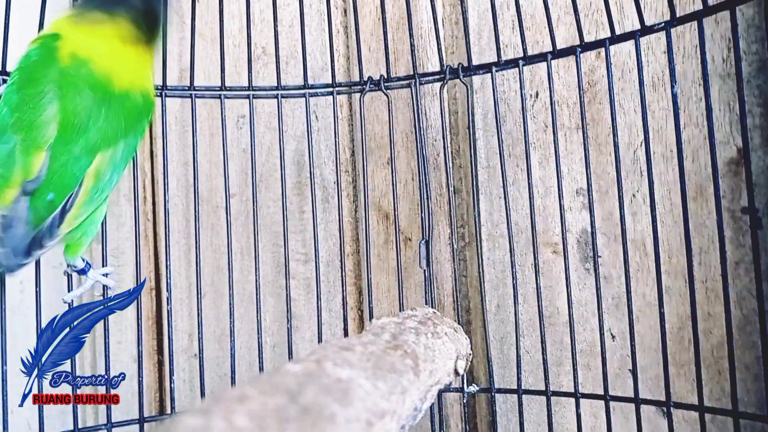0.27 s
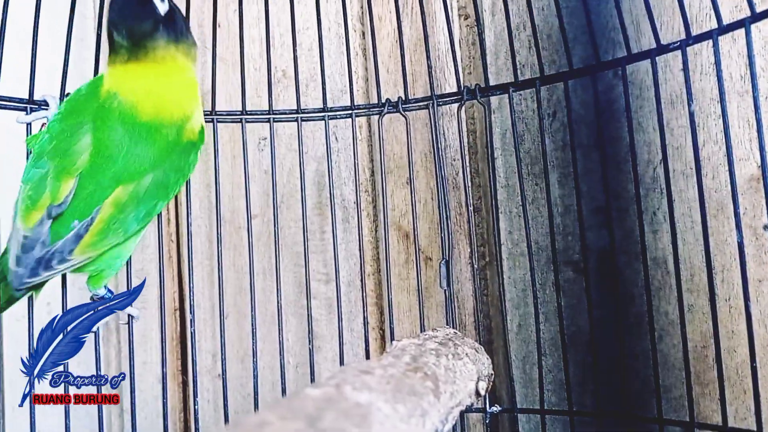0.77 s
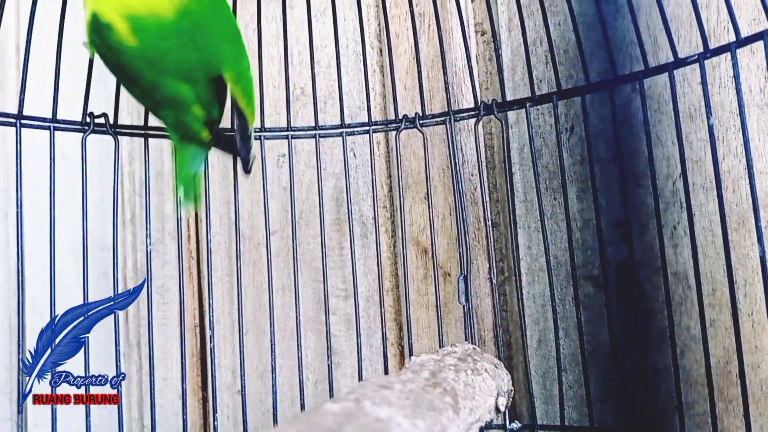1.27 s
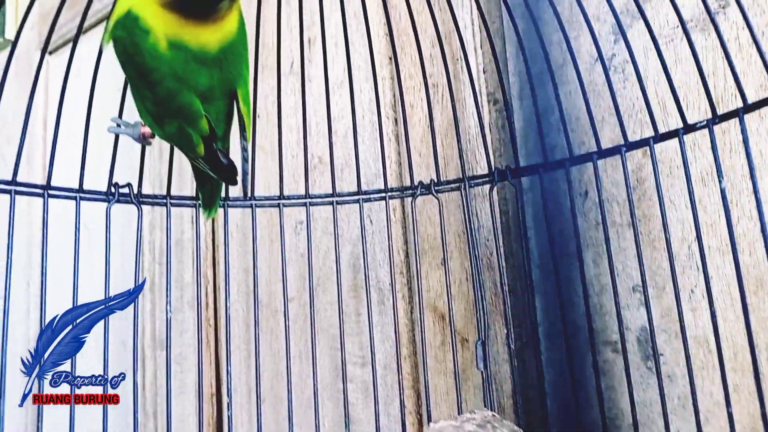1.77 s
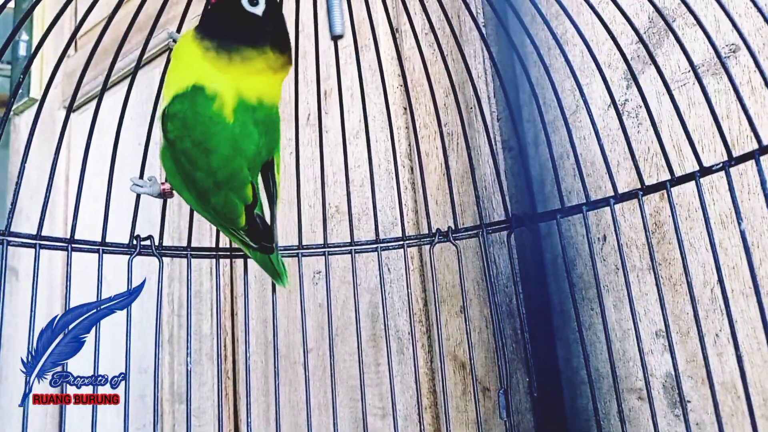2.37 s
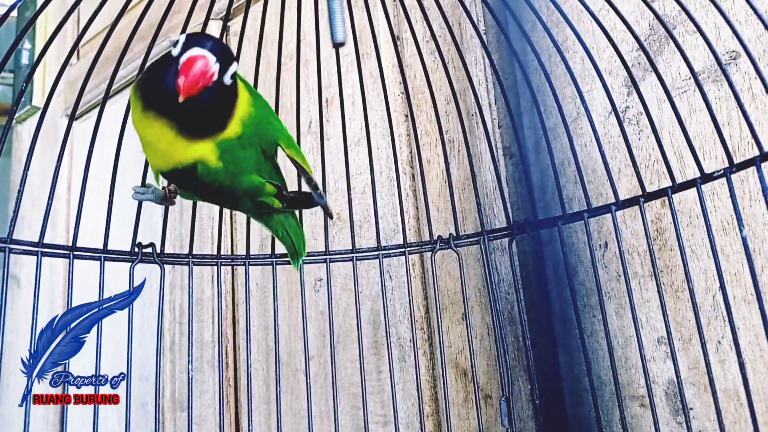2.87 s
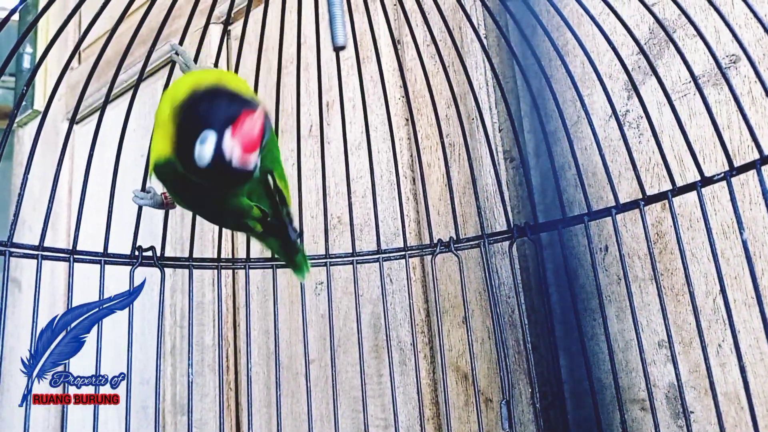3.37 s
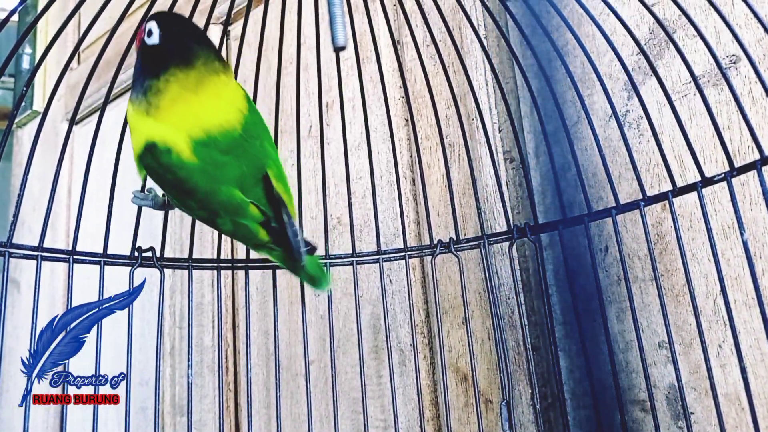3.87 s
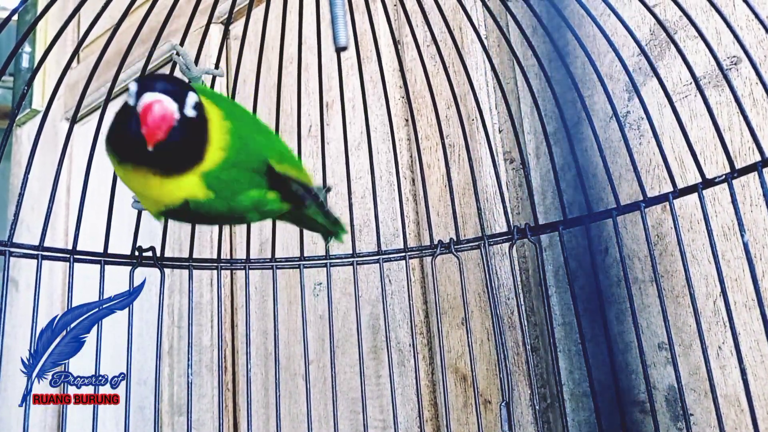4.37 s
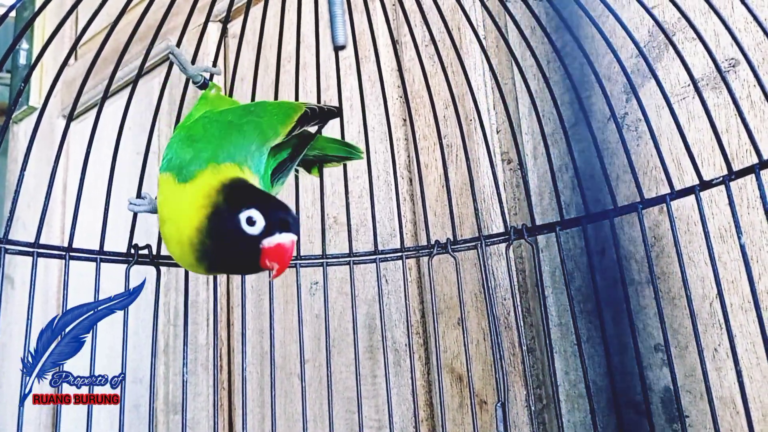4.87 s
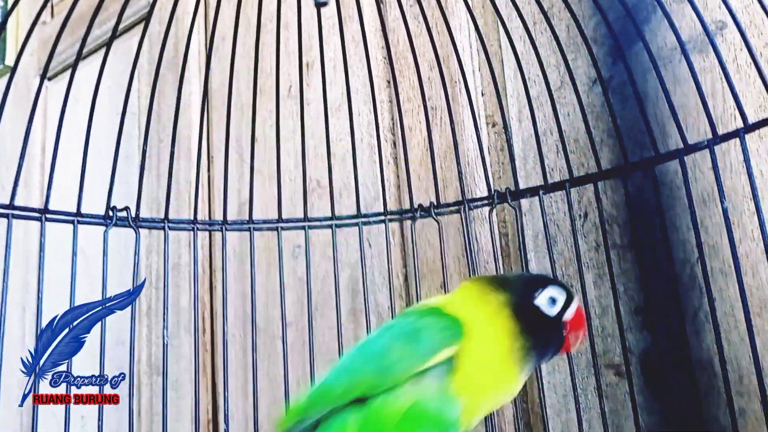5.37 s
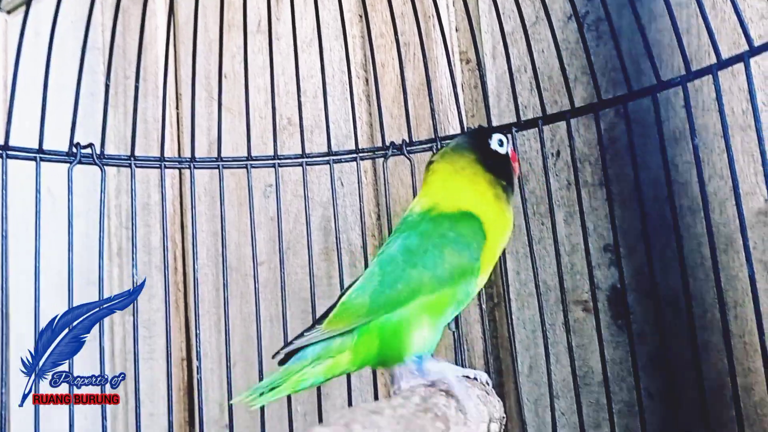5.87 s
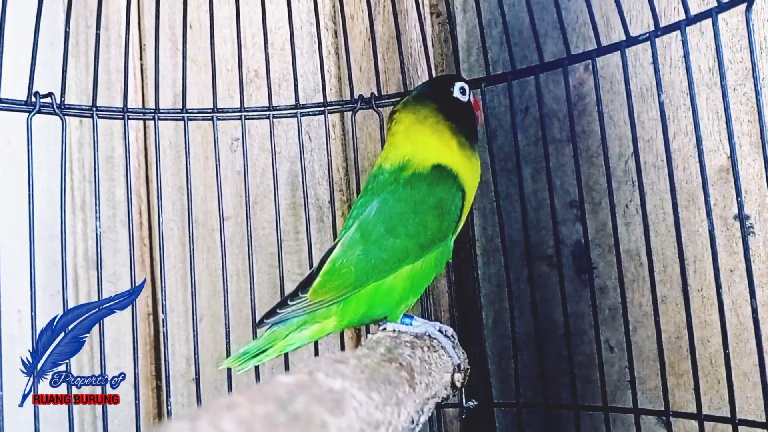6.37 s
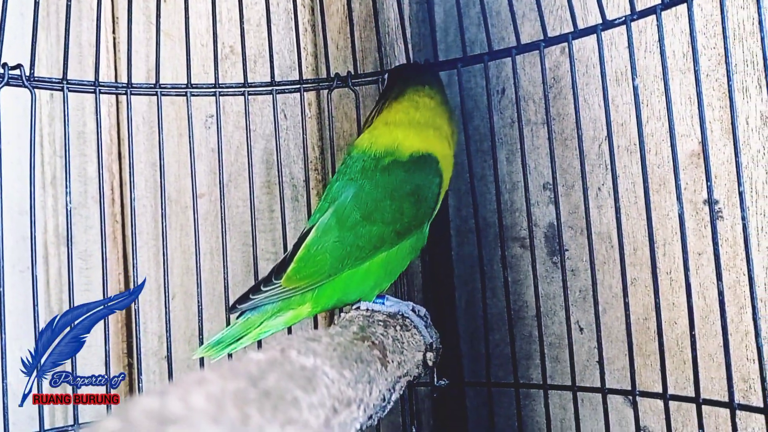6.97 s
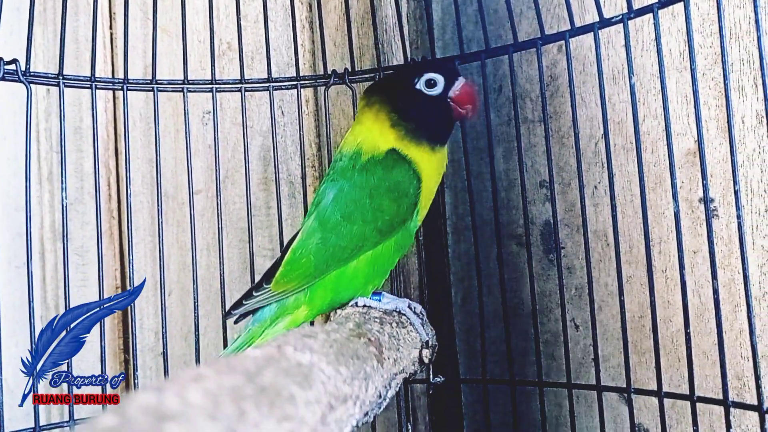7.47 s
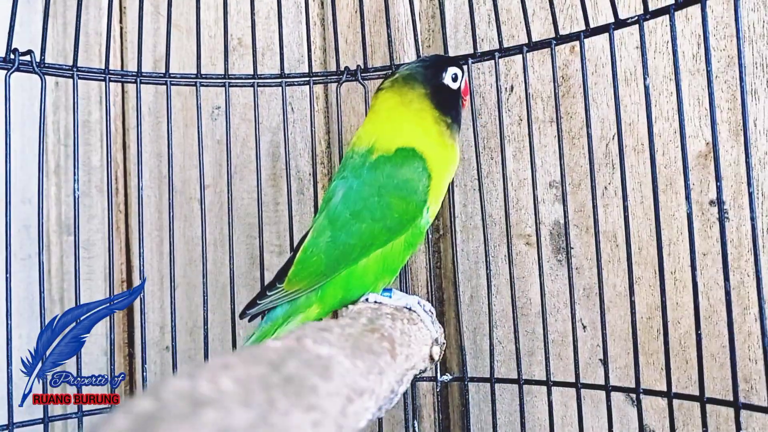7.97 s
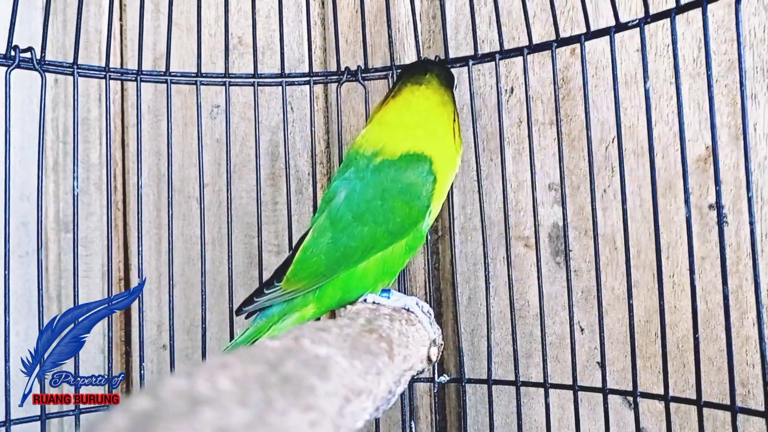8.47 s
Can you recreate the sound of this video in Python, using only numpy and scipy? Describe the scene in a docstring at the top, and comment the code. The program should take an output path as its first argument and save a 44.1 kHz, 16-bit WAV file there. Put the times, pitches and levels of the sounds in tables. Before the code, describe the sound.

Outdoors by a wooden wall, one small parrot calls at machine-like speed near the microphone, bright and piercing with slight cage and yard echo. Its repeated notes begin as sliding whistles, roughen into buzzes and noisy rasps, break into a yelp, whine and rising squeals, then settle into crisp, high ticks. A second bird peeps farther off early and late; quiet rumble, hum, blurred hoots and dull knocks sit underneath.

```python
"""A lovebird chatters in a wire cage close to the microphone, eight to ten syllables a second, over a low
outdoor rumble and a faint hum. Whistled chips give way to buzzes, rasps and stutters, then a yelp, a whine,
rising squeals and short clicking ticks: harmonics of one gliding, fluttering pitch, coloured by throat and beak.
A second bird peeps farther off early and late; narrow noise bands make distant hoots from 1.7 s on, and
decaying modes of the cage stand make three soft knocks, one early and two late."""
import sys
import numpy as np
from scipy import signal
from scipy.fft import rfft, irfft, next_fast_len
from scipy.io import wavfile
from scipy.ndimage import uniform_filter1d, minimum_filter1d, map_coordinates

SR = 44100
rng = np.random.default_rng(int(sys.argv[2]) if len(sys.argv) > 2 else 0)


def dump(signal):
    """Clip the signal to [-1, 1] and save it as 16-bit WAV at the path in sys.argv[1]."""
    limited = np.clip(np.atleast_2d(signal).T, -1, 1)
    pcm = np.round(limited * 32767).astype(np.int16)
    wavfile.write(sys.argv[1], SR, pcm)


N = 384552
TOP_HZ = 15900  # band limit of the voice and of the microphone

# closing ticks of the chatter: t/s, level/dB before the run's gain, top pitch f/Hz
TICKS = [(6.8236, -13, 4250), (6.9258, -15, 4150), (7.0297, -14.5, 4350), (7.1299, -15, 4480),
         (7.2285, -13.5, 4430), (7.3302, -14.5, 4440), (7.431, -14.5, 4380), (7.533, -14.5, 4365),
         (7.6342, -15.0, 4290), (7.7355, -14.0, 4290), (7.8315, -14.5, 4370), (7.9314, -14, 4420),
         (8.0299, -13, 4500), (8.1292, -14, 4440), (8.2298, -14, 4430), (8.3266, -13.5, 4415),
         (8.4268, -14, 4530), (8.529, -13.5, 4460), (8.632, -13, 4355)]


def amp(db):
    """Level to amplitude: 20 dB is a factor of ten."""
    return 10 ** (np.asarray(db) / 20)


def unit(x):
    """Normalization to an rms value of 1."""
    return x / np.sqrt(np.mean(x ** 2) + 1e-20)


def along(points, hz):
    """Interpolation of (f/Hz, value) points on a logarithmic frequency axis."""
    f, v = np.transpose(points)
    return np.interp(np.log(hz + 1), np.log(f), v)


def curve(rows):
    """Linear interpolation of (t/s, value) points to one value per sample."""
    return np.interp(np.arange(N) / SR, *np.transpose(rows))


def wobble(rate, size):
    """Band-limited random fluctuation: a smooth curve through random knots, rate knots a second."""
    knots = rng.standard_normal(1024)
    return map_coordinates(knots, [np.arange(size) * rate / SR], mode="wrap")


def filtered(x, response):
    """Linear filtering: the spectrum of x times a real response of frequency."""
    m = next_fast_len(N + SR // 2)
    hz = np.fft.rfftfreq(m, 1 / SR)
    return irfft(rfft(x, m) * response(hz), m)[..., :N]


def noise(spectrum):
    """Coloured noise: white noise shaped by a spectrum, rms 1."""
    return unit(filtered(rng.standard_normal(N), lambda hz: amp(along(spectrum, hz))))


def envelope(x):
    """Short-term rms strength over a window of 2 ms."""
    return np.sqrt(np.abs(uniform_filter1d(x ** 2, size=90)))


def add(track, s, sound):
    """Superposition: mix a sound into the track at time s."""
    part = track[max(round(s * SR), 0):][:len(sound)]
    part += sound[:len(part)]


def background():
    """Broadband ambience as coloured noise with changing levels, plus three frequency-wandering hum lines."""
    # noise spectra: f/Hz, relative level/dB
    deep_spectrum = [(15, -22), (30, -1), (45, 27), (60, 12), (90, -48)]
    low_spectrum = [(47, -19), (80, -1.5), (92, -3.5), (189, 5), (222, -1), (263, -3), (382, -10.5),
                    (500, -23), (650, -38), (1100, -120)]
    wash_spectrum = [(250, -15), (450, 0.5), (750, -6), (1100, -6.5), (1500, -10), (4000, -9),
                     (11000, -17.5), (13000, -26)]
    # slow swells of rumble and wash: t/s, level/dB before gain
    rumble_level = [(0.1, -48.5), (1.92, -45.5), (2.54, -47.5), (5.29, -46.5), (6.73, -43.5), (7.56, -49),
                    (8.6, -50.5)]
    wash_level = [(0.1, -54), (0.72, -57.5), (1.09, -51.5), (2.4, -55), (5.35, -48.5), (5.66, -46),
                  (6.52, -47.5), (6.96, -55.5), (8.6, -59)]
    # hum lines: f/Hz, waver/share of pitch, gain/dB, flicker/dB
    hum_lines = [(73.5, 0.0253, -1.5, 1.5), (118.4, 0.0344, 0.5, 2.5), (266.2, 0.085, -4.5, 5.5)]
    # strength of each hum line: t/s, level/dB before gain
    hum_low = [(0.1, -60.5), (1.73, -47), (1.78, -44), (3.03, -50), (3.39, -43), (3.58, -53), (4.67, -41),
               (5.38, -49), (6.49, -48), (7.65, -61), (8.41, -43), (8.6, -51)]
    hum_middle = [(0.1, -55), (3.58, -52), (4.55, -58), (6.28, -45), (8.01, -54), (8.6, -53)]
    hum_high = [(0.1, -52), (0.26, -52), (3.37, -52), (4.15, -38), (6.99, -63.5), (7.48, -69), (8.6, -57)]
    rumble_gain_db, wash_gain_db = 3.5, 5
    waver_cycles = 4.5  # cycles of a line per random knot

    deep_db = -51 - 1.7 * np.arange(N) / SR  # the deepest rumble slowly dies away
    deep = amp(deep_db + 1.5 * wobble(8.3, N)) * noise(deep_spectrum)
    rumble_db = curve(rumble_level) + rumble_gain_db + 1.16 * wobble(7.7, N)
    rumble = amp(rumble_db) * noise(low_spectrum)
    wash = amp(curve(wash_level) + wash_gain_db) * noise(wash_spectrum)

    hum = np.zeros(N)
    for (hz, waver, gain_db, flicker_db), level in zip(hum_lines, (hum_low, hum_middle, hum_high)):
        line_db = curve(level) + gain_db + flicker_db * wobble(hz / waver_cycles, N)
        pitch = hz * (1 + waver * wobble(hz / waver_cycles, N))
        hum += amp(line_db) * unit(np.sin(2 * np.pi * np.cumsum(pitch) / SR))
    return deep + rumble + wash + hum


def leap(at_s, lead_db, overshoot, settle_s, release_s, flutter, flutter_from_s, calm_s,
         arch=(0, 0, 1, 0), leap_db=0, sag_per_s=0):
    """Tension control of the syrinx: a lead-in, a leap in pitch with relaxing overshoot, a sag and a release."""
    # arch of the lead-in: height in tension, crest/s, half width/s, swell/dB
    height, crest_s, width_s, swell_db = arch

    def gesture(t, length, leap_s=0.00064, release_db=13):
        """Tension (0 rest, 1 top pitch), effort in dB and flutter depth as share of pitch."""
        bow = np.maximum(1 - ((t - crest_s) / width_s) ** 2, 0)
        up = .5 + .5 * np.tanh((t - at_s) / leap_s)
        strain = np.exp(-np.maximum(t - at_s, 0) / settle_s)
        whistle = 1 + overshoot * strain - sag_per_s * (t - length + release_s)
        tension = (1 - up) * height * bow + up * whistle
        effort_db = (1 - up) * (lead_db + swell_db * bow) + up * leap_db * strain
        effort_db -= release_db * np.maximum(1 - (length - t) / release_s, 0) ** 2
        calming = (t > flutter_from_s) * np.exp(-np.abs(t - flutter_from_s) / calm_s)
        return tension, effort_db, .004 + flutter * calming  # a held whistle keeps a slight tremble
    return gesture


def near_echoes(x, echo_db, reach=0.0037, count=6):
    """Early reflection: wall and cage floor return weak copies, redrawn for each note as the bird moves."""
    out = np.pad(x, (0, SR // 50))
    for when, size in zip(rng.uniform(.05, 1, count), rng.standard_normal(count)):
        add(out, when * reach, amp(echo_db) * size * x)
    return out


def syllable(gesture, length, top_hz, rest_hz, flutter_hz, beak_hz, tilt_db, overtone_db, rough):
    """Source and filter: frequency-modulated harmonics slide through throat and beak resonances; rms about 1."""
    # throat response: f/Hz, level/dB
    throat = [(1600, 10), (2100, 0.5), (2500, -5), (3000, 1), (3700, -5), (4400, -1.5), (5100, -5),
              (6100, 7.5), (7300, -3), (8500, -2.5), (9600, -11.5), (11200, -7.5), (12000, -12.5),
              (12800, -65), (15000, -14.5)]
    shimmer_db = 1.2  # fast unevenness of the voice's strength
    size = int(length * SR)
    haste, pace = np.exp(.05 * rng.standard_normal(2))
    progress = length * np.linspace(0, 1, size) ** haste  # no two notes are timed quite alike
    tension, effort_db, flutter = gesture(progress, length)

    flutter_rate = pace * flutter_hz * (1 + 0.1333 * wobble(151.0, size))
    swing = np.sin(2 * np.pi * np.cumsum(flutter_rate) / SR) * flutter
    low_hz = rest_hz * (1 + .02 * rng.standard_normal())  # each note has a slightly different resting pitch
    pitch = (low_hz + (top_hz - low_hz) * tension) * (1 + swing)
    roughness = rough * np.sqrt(np.abs(flutter)) * wobble(2493, size)
    pitch = np.maximum(pitch * (1 + roughness), 500)

    k = np.arange(1, 8)[:, None]  # harmonic numbers
    harmonic_hz = k * pitch
    beak_db = 6 / (1 + ((harmonic_hz - beak_hz) / 900) ** 2)  # beak resonance, placed for each kind of note
    beak_db -= 6 / (1 + ((harmonic_hz - 1.78 * beak_hz) / 600) ** 2)  # and a notch above it
    source_db = tilt_db * np.log2(k) + overtone_db * (k > 1)
    strength = amp(along(throat, harmonic_hz) + beak_db + source_db) * (harmonic_hz < TOP_HZ)
    strength = strength / np.linalg.norm(strength, axis=0)
    tone = (strength * np.sin(2 * np.pi * k * np.cumsum(pitch) / SR)).sum(0)

    to_end = np.minimum(np.arange(size), np.arange(size)[::-1])
    edge = np.clip(to_end / (0.00098 * SR), 0, 1)
    throb_db = 20 * swing  # the voice weakens at the bottom of each deep swing
    loudness = amp(effort_db + throb_db + shimmer_db * wobble(293, size))
    note = near_echoes(tone * edge * loudness, echo_db=-14)
    return note / np.sqrt(np.sum(note ** 2) / size)


def phrase(rows, gesture, rest_hz, flutter_hz, beak_hz, tilt_db, rough, hiss_db, overtone_db=0, gain_db=0):
    """Superposed like syllables, with turbulent air hiss modulated by their envelope."""
    # air hiss in the voice: f/Hz, relative level/dB
    hiss_spectrum = [(300, -53), (1500, -78), (2400, 24), (6000, 26.5), (11500, -15), (12800, -30),
                     (16000, -34)]
    out = np.zeros(N)
    for s, length, top_hz, db in rows:
        note = syllable(gesture, length, top_hz, rest_hz, flutter_hz, beak_hz, tilt_db, overtone_db, rough)
        add(out, s, amp(db + gain_db) * note)
    return out + amp(hiss_db) * envelope(out) * noise(hiss_spectrum)


def series(rows, length_s, growth_per_s, top_hz, drift_hz_per_s=0, drift_from_s=0):
    """Exponential change of length and linear drift of pitch along a run: t/s, length/s, top f/Hz, level/dB."""
    notes = []
    for s, db in rows:
        length = length_s * np.exp(growth_per_s * (s - rows[0][0]))
        hz = top_hz + drift_hz_per_s * max(s - drift_from_s, 0)
        notes.append((s, length, hz, db))
    return notes


def lovebird():
    """One syrinx under changing tension gives every kind of syllable; returns clear and harsh notes."""
    # runs of syllables: t/s, level/dB before the run's gain
    chip_rows = [(0.0635, -9.5), (0.1818, -9), (0.301, -9.5), (0.419, -9.5), (0.5361, -10), (0.6529, -9.5),
                 (0.772, -8.5), (0.8887, -8), (1.0084, -9), (1.1241, -9), (1.2418, -9.5), (1.3639, -10),
                 (1.4838, -10.5), (1.6018, -9), (1.7216, -10), (1.8432, -10.5), (1.9618, -8.5),
                 (2.0832, -10.5)]
    buzz_rows = [(2.2034, -10.5), (2.3182, -11.5), (2.4292, -11.5), (2.5367, -13.5), (2.638, -13),
                 (2.7403, -12.5), (2.8508, -12), (2.96, -13), (3.0671, -12), (3.1817, -12.5),
                 (3.2938, -13.5), (3.4031, -13), (3.5139, -14), (3.6231, -13.5), (3.7366, -12.5),
                 (3.8529, -12), (3.97, -13.5), (4.0814, -13.5), (4.1946, -13)]
    rasp_rows = [(4.3064, -16.5), (5.1199, -15.5), (5.2251, -15), (5.3275, -14.5), (5.4348, -15),
                 (5.5406, -14.5), (5.6412, -14), (5.7481, -15), (5.8517, -13.0), (5.9612, -14)]
    stutter_rows = [(4.4043, -14.5), (4.5061, -15), (4.6072, -14.5), (4.7067, -15), (4.8049, -15.0),
                    (4.9066, -15.0), (5.0071, -15)]
    squeal_rows = [(6.273, -12.5), (6.377, -13), (6.487, -12), (6.598, -12), (6.711, -13)]
    # single calls: t/s, length/s, top pitch f/Hz, level/dB
    yelps = [(6.058, .057, 4680, -11)]
    whines = [(6.167, 0.044, 3994, -10)]
    rasp_hiss_db = -12

    chips = series(chip_rows, length_s=0.053, growth_per_s=-0.045, top_hz=3657,
                   drift_hz_per_s=-290, drift_from_s=1.045)
    chip = leap(at_s=.0146, lead_db=-5.0, overshoot=0.506, settle_s=0.00724, sag_per_s=4.04, release_s=0.009,
                flutter=0.074, flutter_from_s=.011, calm_s=0.011, arch=(0.34, 0.01304, 0.00387, 1.8))
    clear = phrase(chips, chip, rest_hz=2151.5, flutter_hz=268.4, beak_hz=8550, tilt_db=-0.5, rough=0.08,
                   hiss_db=-38, overtone_db=-7, gain_db=-1.5)

    buzzes = series(buzz_rows, length_s=0.042, growth_per_s=.06, top_hz=2829,
                    drift_hz_per_s=51, drift_from_s=2.13)
    buzz = leap(at_s=.0097, lead_db=2.5, overshoot=0.339, settle_s=0.0077, release_s=0.015,
                flutter=0.19, flutter_from_s=.0098, calm_s=0.028, leap_db=4.5)
    harsh = phrase(buzzes, buzz, rest_hz=2100, flutter_hz=258.4, beak_hz=5190, tilt_db=3.5, rough=.07,
                   hiss_db=-19)

    rasps = series(rasp_rows, length_s=0.044, growth_per_s=-0.21, top_hz=4510)
    rasp = scrape(snap_at_s=0, rattle_at_s=0.011, rattle_tension=0.35, rattle_db=-3, flutter=0.17, calm_s=0.066)
    harsh += phrase(rasps, rasp, rest_hz=2157, flutter_hz=206.3, beak_hz=5150, tilt_db=2.0, rough=0.17,
                    hiss_db=rasp_hiss_db, gain_db=0.5)

    stutters = series(stutter_rows, length_s=0.043, growth_per_s=-0.042, top_hz=4370)
    stutter = scrape(snap_at_s=.009, rattle_at_s=.0183, rattle_tension=.42, rattle_db=-2.0,
                     flutter=0.26, calm_s=0.03, blip_db=-6)
    harsh += phrase(stutters, stutter, rest_hz=2176, flutter_hz=219.5, beak_hz=5620, tilt_db=0.5, rough=0.16,
                    hiss_db=rasp_hiss_db, gain_db=-.5)

    yelp = leap(at_s=0.033, lead_db=-2, overshoot=0.15, settle_s=.005, release_s=0.014,
                flutter=0.034, flutter_from_s=0.065, calm_s=.005, arch=(0.3, 0.027, .024, 5.6))
    clear += phrase(yelps, yelp, rest_hz=2210, flutter_hz=250, beak_hz=6200, tilt_db=-0.5, rough=.05,
                    hiss_db=-21)

    whine = leap(at_s=.007, lead_db=-19, overshoot=-.27, settle_s=.011, release_s=.013,
                 flutter=.15, flutter_from_s=.0275, calm_s=.0055, leap_db=-12)
    clear += phrase(whines, whine, rest_hz=2130, flutter_hz=247, beak_hz=8600, tilt_db=-6.0, rough=0.057,
                    hiss_db=-29)

    squeals = series(squeal_rows, length_s=.044, growth_per_s=0.19, top_hz=4665)
    squeal = leap(at_s=.0275, lead_db=-5.5, overshoot=0.77, settle_s=0.0038, release_s=0.0051,
                  flutter=0.028, flutter_from_s=0.012, calm_s=0.0052, arch=(.8, .025, .014, 12.1), leap_db=10.5)
    clear += phrase(squeals, squeal, rest_hz=1997, flutter_hz=241, beak_hz=9460, tilt_db=-5.5, rough=.14,
                    hiss_db=-23.5)

    tick_s = .034  # length of a tick
    ticks = [(s, tick_s, hz, db) for s, db, hz in TICKS]
    tick = leap(at_s=.0082, lead_db=-0.5, overshoot=0.25, settle_s=0.0044, sag_per_s=3.7, release_s=0.0128,
                flutter=0.092, flutter_from_s=.002, calm_s=0.013, arch=(0.65, 0.0048, 0.002884, 2), leap_db=1)
    clear += phrase(ticks, tick, rest_hz=2267, flutter_hz=253, beak_hz=10600, tilt_db=-1.0, rough=.13,
                    hiss_db=-31, gain_db=-.5)
    return clear, harsh


def room(x, decay):
    """Diffuse reverberation: convolution with a noise tail whose decay time depends on frequency."""
    hz, t, z = signal.stft(rng.standard_normal(SR // 2), SR, nperseg=256)
    decay_db = -60 * t / along(decay, hz)[:, None]
    tail = signal.istft(z * amp(decay_db), SR, nperseg=256)[1]
    delayed = np.pad(x, (200, 0))  # samples before the first return
    return signal.fftconvolve(delayed, tail / np.linalg.norm(tail))[:N]


def far_bird():
    """A second voice on the same source-filter principle throws in thin, high peeps."""
    # peeps, and one shorter pip: t/s, length/s, top pitch f/Hz, level/dB
    far_calls = [(.066, 0.081, 6260, -32.5), (5.301, 0.023, 5710, -19), (5.381, 0.039, 6120, -23),
                 (7.289, 0.03, 6410, -19)]
    far_pips = [(7.909, .016, 6510, -16.5)]
    peep = leap(at_s=0.013, lead_db=-7, overshoot=-0.083, settle_s=0.0052, release_s=0.003,
                flutter=0.07, flutter_from_s=0.0038, calm_s=0.014)
    pip = leap(at_s=0, lead_db=-23, overshoot=0.017, settle_s=0.0028, release_s=0.0051,
               flutter=.004, flutter_from_s=0, calm_s=.01)
    peeps = phrase(far_calls, peep, rest_hz=2167, flutter_hz=250, beak_hz=5760, tilt_db=1.0, rough=0.087,
                   hiss_db=-34)
    pips = phrase(far_pips, pip, rest_hz=2170, flutter_hz=250, beak_hz=6600, tilt_db=3, rough=.03,
                  hiss_db=-36)
    return peeps + pips


def knocks():
    """Modal ringing: soft contacts on the cage stand excite damped modes, dulled by a second-order low-pass."""
    # contacts: t/s, level/dB, dullness corner f/Hz
    contacts = [(0.448, -53.5, 2500), (7.233, -40.5, 497), (8.432, -44, 327)]
    # modes of the stand: f/Hz, level/dB, t60/s
    stand_modes = [(89.5, 11.5, 0.1), (146, 12, 0.14), (257, 16, 0.058), (378, 18.5, 0.056),
                   (455, 16.5, 0.059), (625, 17.5, 0.024), (864, 19, 0.031), (1290, 22, 0.026)]
    out, t = np.zeros(N), np.arange(SR // 4) / SR
    for s, db, corner_hz in contacts:
        ring = np.zeros(len(t))
        for hz, level, t60 in stand_modes:
            decay = amp(level + rng.normal(0, 1.0) - 60 * t / t60)
            mode = decay * np.sin(2 * np.pi * hz * t + rng.uniform(0, 2 * np.pi))
            ring += mode / np.hypot(1, (hz / corner_hz) ** 2)
        soft_onset = 1 - np.exp(-t / 0.00068)
        add(out, s, amp(db) * ring * soft_onset)
    return out


def hoots():
    """Random modulation: far-off calls are blurred by distance into narrow bands of noise."""
    # distant calls: t/s, length/s, pitch f/Hz, level/dB
    calls = [(1.661, 0.23, 1045, -48.5), (2.04, 0.25, 967, -56), (3.867, 0.12, 1066, -45.5),
             (4.222, 0.073, 1090, -50), (4.852, 0.096, 1125, -45), (5.443, 0.12, 1123, -49),
             (7.143, 0.13, 990, -49)]
    out = np.zeros(N)
    for s, length, hz, db in calls:
        t = np.arange(int(length * SR)) / SR
        blur = wobble(125, len(t)) + 1j * wobble(109, len(t))
        band = unit(np.real(blur * np.exp(2j * np.pi * hz * t)))
        add(out, s, amp(db) * np.hanning(len(t)) * band)
    return out


def scrape(snap_at_s, rattle_at_s, rattle_tension, rattle_db, flutter, calm_s, blip_db=-10):
    """Interrupted phonation: a snap falls from top pitch to rest, then a rattle fades; a late snap has a blip ahead."""
    snap_s, rattle_fade_db = .006, 10

    def gesture(t, length, blip_s=.0028, gap_db=-19, kick=.18, kick_s=.004, snap_flutter=.04):
        """Tension (0 rest, 1 top pitch), effort in dB and flutter depth as share of pitch."""
        fall = np.clip((t - snap_at_s) / snap_s, 0, 1)
        since = np.maximum(t - rattle_at_s, 0)
        lumps_db = 3 * wobble(287, len(t))  # the rattle comes in uneven bursts
        fade_db = rattle_fade_db * (since / (length - rattle_at_s)) ** 2
        parts = [t >= rattle_at_s, t >= snap_at_s, t < blip_s]  # rattle, snap, blip
        rattle = rattle_tension + kick * np.exp(-since / kick_s)
        tension = np.select(parts, [rattle, 1 - fall ** 2, .5], .5)
        efforts_db = [rattle_db + lumps_db - fade_db, gap_db * fall ** 4, blip_db]
        effort_db = np.select(parts, efforts_db, 2 * gap_db)
        effort_db = uniform_filter1d(effort_db, size=32)  # each burst takes a moment to open
        depth = np.where(parts[0], flutter * np.exp(-since / calm_s), snap_flutter)
        return tension, effort_db, depth
    return gesture


def beak_clicks(lead=0.019, ring_hz=2250, t60=0.012, db=-36):
    """Damped impulse response: a tiny click of tone and noise decays just ahead of each tick."""
    out, t = np.zeros(N), np.arange(SR // 40) / SR
    for s, *_ in TICKS:
        decay = amp(db + rng.normal(0, 3.7) - 60 * t / t60)
        click = np.sin(2 * np.pi * ring_hz * t) + 0.83 * rng.standard_normal(len(t))
        add(out, s - lead, decay * click)
    return out


def scene():
    """Superposition of direct sound, reverberation and background, with side noise of opposite sign per ear."""
    # decay times of the cage and wall, and of the wider surroundings: f/Hz, t60/s
    cage_decay = [(2000, 0.11), (7000, 0.12), (12000, 0.057)]
    yard_decay = [(200, 0.073), (3000, 0.87), (7000, 0.35), (12000, 0.085)]
    # spectrum of the added side noise: f/Hz, relative level/dB
    side_spectrum = [(6500, -50), (8500, -49), (11500, 36), (12600, -14)]
    clear, harsh = lovebird()
    near, far = clear + harsh, far_bird()
    echoes = room(amp(-22.5) * (near + far), cage_decay)
    echoes += room(amp(-34.5) * near + amp(-11) * far, yard_decay)  # the far bird is much more reverberant
    mono = near + far + echoes + beak_clicks() + knocks() + hoots() + background()
    # noise above 8 kHz, opposite in the two ears, follows the harsh notes' strength
    side = amp(-22) * envelope(harsh) * noise(side_spectrum)
    return np.array([mono + side, mono - side])


def record(dry):
    """Peak limiting by a fast smoothed gain, then a microphone response that drops in the top treble."""
    ceiling = .85
    need = np.minimum(1, ceiling / (np.abs(dry).max(0) + 1e-9))
    gain = uniform_filter1d(minimum_filter1d(need, size=40), size=40)
    treble = [(12000, 0.5), (12900, -16), (15500, -17)]  # f/Hz, level/dB
    return filtered(dry * gain, lambda hz: amp(along(treble, hz)) * (hz < TOP_HZ))


dry = scene()
out = record(dry)
dump(out)
```